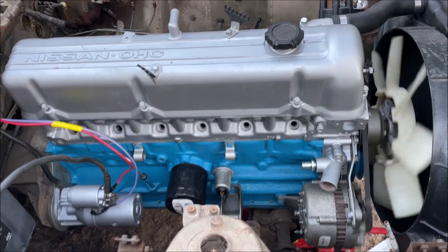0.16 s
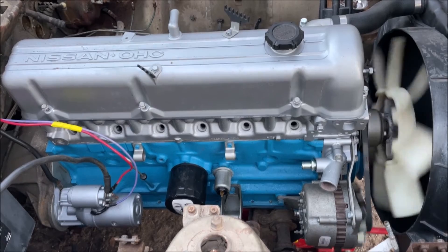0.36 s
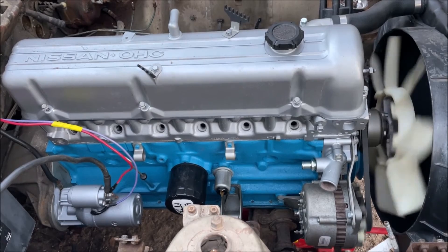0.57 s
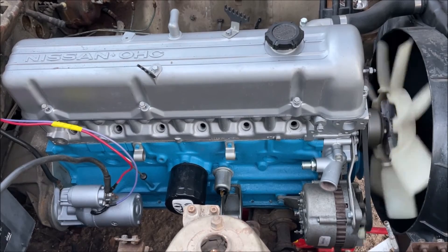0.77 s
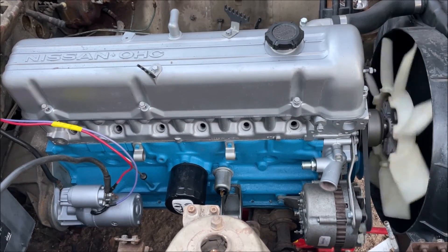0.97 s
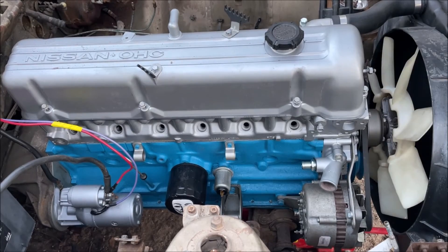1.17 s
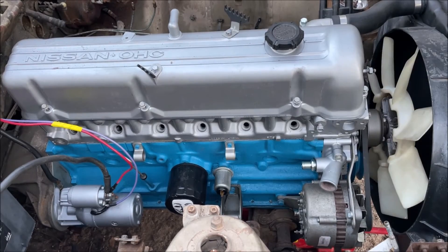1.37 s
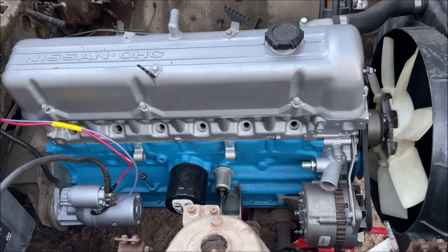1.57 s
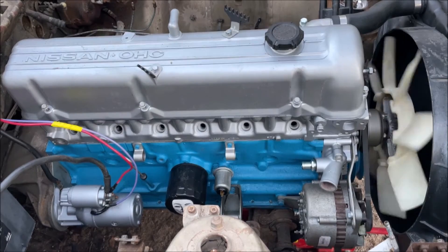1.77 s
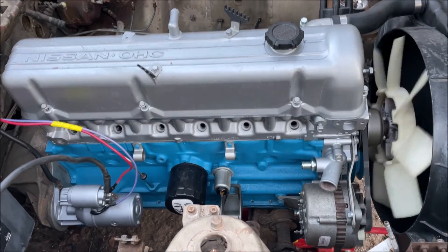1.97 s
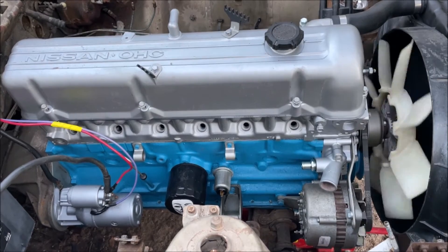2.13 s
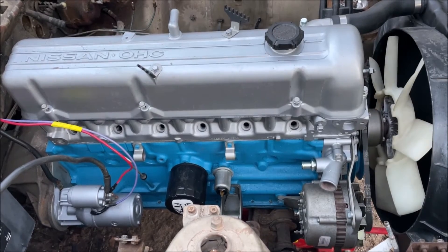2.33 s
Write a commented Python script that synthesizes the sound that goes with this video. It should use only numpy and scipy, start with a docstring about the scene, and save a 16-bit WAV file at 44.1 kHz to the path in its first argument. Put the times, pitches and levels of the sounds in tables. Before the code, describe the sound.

A starter motor, heard close up in a garage, clacks in at 0.2 seconds and whirs upward, clacking out at 0.5. Its gritty whine falls away by 1.3 seconds, with a thin squeak around 0.9. Faint metal ticks follow. Two shorter bursts come at 1.7 and 2.0 seconds, each with rattling clacks, a thud and a falling whir, ending by 2.4. A faint outdoor rumble lies underneath.

```python
"""A garage, with a phone close to a bare engine whose starter motor is switched on three times.
Each time the solenoid clacks in and out, ringing the casing and thudding the mount; gears and brushes
whir through the iron block and coast to rest, the first time with a thin squeak. Behind the motor are
a low outdoor rumble, a short reflection off the walls and faint ticks of a small metal part."""
import sys
import numpy as np
from scipy import signal
from scipy.fft import rfft, irfft
from scipy.io import wavfile
from scipy.ndimage import uniform_filter1d

SR = 44100
rng = np.random.default_rng(int(sys.argv[2]) if len(sys.argv) > 2 else 0)


def generate_wav(signal):
    """Clip the signal to [-1, 1] and save it as 16-bit WAV at the path in sys.argv[1]."""
    frames = np.transpose(np.atleast_2d(signal))
    scaled = np.clip(frames, -1, 1) * 32767
    pcm = np.round(scaled).astype(np.int16)
    wavfile.write(sys.argv[1], SR, pcm)


N = 105840
T = np.arange(N) / SR
HZ = np.maximum(np.arange(N // 2 + 1) * SR / N, 1)


def undb(db):
    """Decibels to gain."""
    return 10 ** (np.asarray(db) / 20)


def level(x, db=0):
    """Scale to an rms level."""
    return x * undb(db) / np.sqrt(np.mean(x ** 2))


def over_hz(table):
    """Read rows of freq_hz, value at every frequency of the spectrum."""
    hz, value = np.array(table, float).T
    return np.interp(np.log(HZ), np.log(hz), value)


def colour(x, table):
    """Filter a signal by rows of freq_hz, gain_db."""
    return irfft(rfft(x) * undb(over_hz(table)), N)


def ring(x, hz, t60):
    """One decaying mode; an impulse of 1 gives a peak near 1."""
    radius, angle = np.exp(-np.log(1000) / (t60 * SR)), 2 * np.pi * hz / SR
    return signal.lfilter([np.sin(angle)], [1, -2 * radius * np.cos(angle), radius * radius], x)


def walk(rate):
    """Smooth random wander of rms 1, with `rate` new values a second."""
    span = int(SR / rate)
    steps = np.repeat(rng.standard_normal(N // span + 1), span)
    return level(uniform_filter1d(uniform_filter1d(steps, span), span)[:N])


def burst(start, hold, t60, rise):
    """Envelope: quick rise, hold, exponential fall, all in seconds."""
    age = T - start
    return np.clip(age / rise, 0, 1) ** 2 * undb(-60 * np.clip(age - rise - hold, 0, None) / t60)


# Outdoor rumble as heard in the garage: freq_hz, gain_db
RUMBLE_COLOUR = [(50, -25), (100, -4), (200, -9.5), (420, -17.5), (1090, -26.5), (1600, -35.5),
                 (2750, -55.5), (6000, -70), (11400, -64.5), (14000, -88.5)]
# Its stereo width, side against mid: freq_hz, gain_db
RUMBLE_WIDTH = [(60, -13), (300, -12.5), (700, 0), (1400, 0)]
# Its deepest part: freq_hz, gain_db
DEEP_COLOUR = [(22, -34), (35, -12), (46, 0), (75, -3), (110, -18), (250, -90)]
# Swell of that deepest part: time_s, level_db
DEEP_SWELL = [(0, -42), (.14, -47), (.25, -50), (.37, -43), (.42, -51), (.51, -46), (.59, -55), (1.12, -55),
              (1.38, -46), (1.45, -51), (1.68, -52), (1.77, -47), (1.83, -41), (1.9, -48), (2.02, -49),
              (2.08, -41), (2.21, -50), (2.27, -44), (2.4, -49)]

def outdoor_rumble():
    """Dark steady background; its deepest part swells and is alike left and right."""
    mid, side, deep = rng.standard_normal((3, N))
    mid = colour(mid, RUMBLE_COLOUR)
    side = colour(colour(side, RUMBLE_COLOUR), RUMBLE_WIDTH)
    bed = level(np.array([mid + side, mid - side]), db=-49.5) * undb(walk(7.49))
    swell = undb(np.interp(T, *np.array(DEEP_SWELL, float).T))
    return bed + swell * level(colour(deep, DEEP_COLOUR))


# What the garage walls return, against the direct sound: freq_hz, gain_db
WALL_COLOUR = [(150, -20), (400, -11), (800, -3), (1500, 0), (3000, -2), (5000, -8), (7500, -16),
               (14000, -18)]

def wall_reflections(sound, port_gains):
    """The walls scatter the sound into a short diffuse tail, a separate one at each microphone port."""
    tail = rng.standard_normal((2, N)) * burst(start=.0022, hold=0, t60=.053, rise=.0025)
    tail /= np.sqrt(np.sum(tail ** 2, axis=1, keepdims=True))
    reflected = rfft(sound) * undb(over_hz(WALL_COLOUR))
    return irfft(rfft(tail) * reflected * port_gains, N)


# Ticks of a small metal part, far below the motor in level: start_s, level_db
TICK_EVENTS = [(0.022, -66.5), (0.1211, -68), (0.18, -70.5), (1.271, -68), (1.3109, -73), (1.4344, -76),
               (1.4588, -61), (1.562, -63), (1.6136, -76.5), (1.686, -66)]
# Their bright spectrum: freq_hz, gain_db
TICK_SPECTRUM = [(3000, -34), (4700, -11), (5600, -26), (9000, -18), (11200, 0), (13000, -16), (15000, -28)]

def metal_ticks():
    """A small metal part ticks faintly, each tick a short burst of bright noise."""
    envelope = sum(undb(db) * burst(start, hold=.004, t60=.05, rise=.001) for start, db in TICK_EVENTS)
    return envelope * level(colour(rng.standard_normal(N), TICK_SPECTRUM))


# Squeak during the first coast-down: time_s, pitch_hz, level_db
SQUEAK_PATH = [(0.826, 9300, -57), (.845, 9900, -36), (.865, 10740, -42), (.89, 10200, -41),
               (0.906, 9400, -27.5), (.92, 9200, -24), (.93, 9150, -62)]

def shaft_squeak():
    """One thin, wavering squeak as the shaft slows."""
    times, hz, db = np.array(SQUEAK_PATH, float).T
    pitch_hz = np.interp(T, times, hz) * (1 + .0091 * walk(300))
    level_db = np.interp(T, times, db, left=-120, right=-120) + 2.8 * walk(80)
    return undb(level_db) * np.sin(2 * np.pi * np.cumsum(pitch_hz) / SR)


# Solenoid and pinion blows, close to the phone: start_s, clack_db, thud_db, rattle_s, thud_lag_s
SOLENOID_BLOWS = [(0.2316, -12.5, -27, 0.0065, 0.0065), (0.515, -13, -27.5, 0.015, .004),
                  (1.7105, -13.5, -25, 0.0073, 0.0071), (1.7390, -26.5, -22.5, .007, -.003),
                  (1.757, -15.5, -16.5, 0.0094, -.003), (1.7678, -18.5, -29, 0.0029, -0.0078),
                  (2.0373, -12, -23.5, 0.0053, 0.0075), (2.064, -28, -23.5, 0.0027, -0.0063),
                  (2.0705, -14, -23, 0.0072, -.001), (2.085, -28, -24.5, 0.0026, 0.004)]
# The bare clack: freq_hz, gain_db
CLACK_SPECTRUM = [(500, -80), (820, -14), (1610, -23.5), (1970, -7.5), (2920, -4.5), (5880, -13.5),
                  (8850, 1.5), (11500, -16.5), (14000, -13), (16000, -69.5)]
# Bright modes of the casing: pitch_hz, gain_db, t60_s
CASING_MODES = [(828, -11, 0.063), (1580, -16, 0.066), (2030, -7, 0.041), (2470, -14.5, 0.047),
                (3058, -12, .05), (4892, -19, .03), (5393, -11.5, .03), (6480, -8.5, .03),
                (6620, -5, 0.036), (9140, -15.5, .02), (11380, -8.5, .02)]
# Low modes of the mount: pitch_hz, gain_db, t60_s
MOUNT_MODES = [(116, -16, 0.28), (240.6, -2, 0.13), (311, -4, 0.068), (465, -43, 0.057)]

def solenoid_blows():
    """Each blow is a short rattle that rings the casing, and a softer push that thuds the mount."""
    sag_db_per_s, push_s = 414, .0017
    shake, push = np.zeros((2, N))
    for start, clack_db, thud_db, rattle_s, lag_s in SOLENOID_BLOWS:
        sag_db = sag_db_per_s * np.clip(T - start, 0, rattle_s)  # the rattle weakens while it lasts
        shake += undb(clack_db - sag_db) * burst(start, rattle_s, t60=.02, rise=.0008)
        pulse = np.exp(-.5 * ((T - start - lag_s) / (push_s / 4)) ** 2)
        push += undb(thud_db) * pulse / (push_s * SR / 2)
    grit = level(rng.standard_normal(N) * undb(walk(1200)))
    clack = shake * level(colour(grit, [(200, -43)] + list(CLACK_SPECTRUM)))
    casing = sum(undb(db) * ring(grit * shake, hz, t60) / np.sqrt(t60 * SR / 28)
                 for hz, db, t60 in CASING_MODES)
    mount = sum(undb(db) * ring(push, hz, t60) for hz, db, t60 in MOUNT_MODES)
    return clack + undb(-7) * casing + mount


# Spells with the pinion in the ring gear: start_s, end_s
PINION_MESH = [(.24, 0.47), (1.72, 1.76), (2.045, 2.07)]
# Partials of the armature whine: pitch_ratio, gain_db, mesh_change_db
WHINE_PARTIALS = [(1, -8, 0), (2.04, -5, -15), (3.4, -12, 0)]
# What the block lets through of the whine: freq_hz, gain_db
WHINE_THROUGH_BLOCK = [(600, -22), (950, -8), (1170, 0), (1400, -3), (1700, 0), (2050, 0), (2350, -18),
                       (3300, -18), (3700, -3), (4300, -3), (4800, -20)]

def armature_tones(whine_hz):
    """Whine and hum follow the armature; in mesh the ring gear teeth sound and the hum weakens."""
    teeth_ratio, hum_ratio = .225, .103  # of the whine pitch
    phase = 2 * np.pi * np.cumsum(whine_hz * (1 + .008 * walk(50))) / SR
    mesh = sum(burst(start, end - start, t60=.05, rise=.0084) for start, end in PINION_MESH)
    whine = sum(undb(db + mesh_db * mesh + 2.5 * walk(30)) * np.sin(ratio * phase)
                for ratio, db, mesh_db in WHINE_PARTIALS)
    tooth_tone = np.sin(teeth_ratio * phase) + .4 * np.sin(2 * teeth_ratio * phase)
    teeth = mesh * undb(-8 + 3.8 * walk(25)) * tooth_tone
    hum = undb(-11 - 5 * mesh + 3 * walk(20)) * np.sin(hum_ratio * phase)
    return colour(whine, WHINE_THROUGH_BLOCK) + teeth + hum


# Gear and brush noise at close range: freq_hz, gain_db
GEAR_COLOUR = [(240, -38), (450, 0), (1140, 5), (1900, -1), (2750, 0.5), (3640, -8), (7000, -4),
               (9500, -10.5), (11600, -14), (13500, -18), (15800, -26), (16300, -40)]
# Resonances of the iron block: pitch_hz, width_hz, gain_db
BLOCK_MODES = [(612, 27, 3.5), (797, 26, 1.5), (913, 90, 4), (1184, 15, 5), (1453, 40, -7),
               (1583, 38, -9.5), (1704, 49, 5.5), (1875, 78, -10.5), (2085, 100, 2.5), (2543, 17, -10.5),
               (2773, 54, -2), (4340, 140, -3), (4950, 29, -2.5), (7000, 260, 3.5)]

def gears_and_brushes(treble_db):
    """Grainy gear and brush noise rings the block; treble_db lifts or lowers its top."""
    grain_db, grains_per_s, treble_hz = 2, 900, 3000
    grit = rng.standard_normal(N) * undb(grain_db * walk(grains_per_s))
    block = sum(level(ring(grit, hz, t60=2.2 / width_hz), db) * undb(3 * walk(22))
                for hz, width_hz, db in BLOCK_MODES)
    gears = level(colour(grit, GEAR_COLOUR)) + level(block, db=-6)
    body = irfft(rfft(gears) / (1 + (HZ / treble_hz) ** 2), N)
    return body + undb(treble_db) * (gears - body)


# The starter close up, one list a run: time_s, gain_db, relative_bass_db, relative_treble_db, whine_hz
STARTER_RUNS = [
    [(.232, -53.5, 13, 15, 800), (.245, -28, -4.5, -6, 880), (.30, -29, -2.5, 2.5, 1130),
     (.45, -33.5, -11.5, 11.5, 1652), (.51, -27.5, -9, 5, 1884), (.57, -34, -5.5, 9.5, 1629),
     (.64, -31.5, -5.5, 5.5, 1432), (.72, -33, -6.5, 5, 1236), (.83, -34.5, -6.5, 6.5, 991),
     (.97, -32, -9.5, 1.5, 738), (1.06, -34.5, -9, 0.5, 575), (1.15, -37.5, -10.5, -5.5, 420),
     (1.24, -48, 1, -23, 260.3), (1.33, -94, -5.5, -25.5, 150), (1.4, -110, 0, 0, 100.2)],
    [(1.709, -110, 1, 0, 600), (1.712, -76, 4, 0, 701), (1.73, -28.5, -0.5, 5.5, 900),
     (1.77, -30.5, -1, -2, 1150), (1.80, -39.5, -9.5, 2.5, 1093), (1.90, -36.5, -3.5, -1.5, 660),
     (1.99, -34.5, -16.5, -6.5, 420), (2.035, -47.5, 5, -2, 308.7)],
    [(2.038, -30.5, -15.5, 13, 396.4), (2.06, -29.5, 8.5, 8, 700), (2.11, -36, -1, 2, 610),
     (2.18, -40.5, -6, -5.5, 500), (2.24, -36, -6, -3, 399), (2.3, -42.5, -9.5, -10.5, 299.7),
     (2.36, -47.5, -2, -28, 216), (2.4, -77, 35, -6, 150)],
]
# Low noise of the running motor: freq_hz, gain_db
MOTOR_BASS = [(59, -23), (100, -2.5), (123, -3.5), (275, 6), (334, 0), (553, -8.5), (600, -2.5), (780, -23),
              (1320, -120)]

def starter_whir():
    """The motor spins up and coasts down three times: gear noise, armature tones and a rough bass."""
    times, *curves = np.concatenate(STARTER_RUNS).T
    gain_db, bass_db, treble_db, whine_hz = (np.interp(T, times, curve) for curve in curves)
    motor = gears_and_brushes(treble_db) + armature_tones(whine_hz)
    bass_colour = [(60, -59)] + list(MOTOR_BASS) + [(900, -51)]  # flat floors below 60 and above 900 Hz
    bass = level(colour(rng.standard_normal(N), bass_colour)) * undb(bass_db + 1.8 * walk(11))
    return (T > times[0]) * undb(gain_db) * (motor + bass)


# Phase between the phone's two microphone ports: freq_hz, left_lead_rad
MIC_PHASE = [(20, 0), (300, .1), (800, .8), (1720, 0), (3200, 1.1), (4000, 0), (5200, .8), (6000, 0),
             (7800, -3), (8800, -3.3), (10300, -5.4), (11600, -6.3), (12800, -6.9), (13900, -9.3),
             (15200, -9.5), (16500, -10.6)]
# Balance between the ports: freq_hz, left_over_right_db
MIC_BALANCE = [(60, 6), (110, 0.5), (200, 1), (380, 0.5), (700, 1), (1290, 4), (2380, 7), (4400, 6.5),
               (8120, 0.5), (15000, -1)]

def scene():
    """The motor reaches two microphone ports with their own phase and level, and again off the walls."""
    whir = starter_whir()
    short_sounds = solenoid_blows() + shaft_squeak() + metal_ticks()
    left_port = undb(over_hz(MIC_BALANCE) / 2) * np.exp(.5j * over_hz(MIC_PHASE))
    ports = np.array([left_port, 1 / left_port])
    direct = irfft(rfft(whir + short_sounds) * ports, N)
    walls = wall_reflections(whir + undb(-1.5) * short_sounds, np.abs(ports))
    return direct + walls + outdoor_rumble()


def record(dry):
    """The phone drops the bass below 30 Hz and cuts the top above 16.4 kHz."""
    low_cut = signal.butter(2, 30, "high", fs=SR, output="sos")
    high_cut = signal.ellip(10, .2, 80, 16400, fs=SR, output="sos")
    return signal.sosfilt(high_cut, signal.sosfilt(low_cut, dry))


dry = scene()
out = record(dry)
generate_wav(out)
```